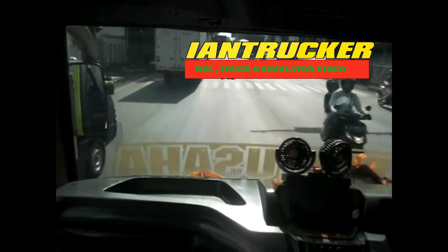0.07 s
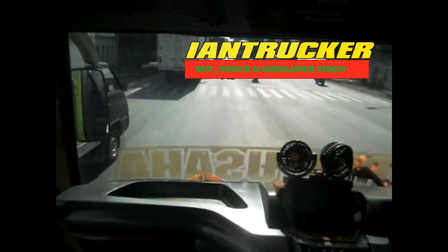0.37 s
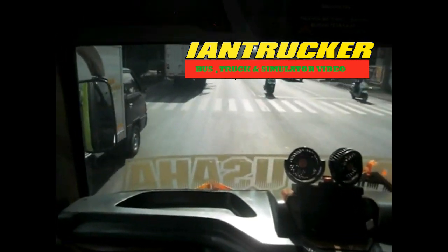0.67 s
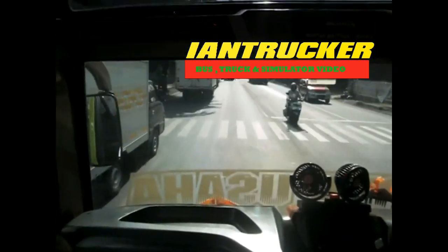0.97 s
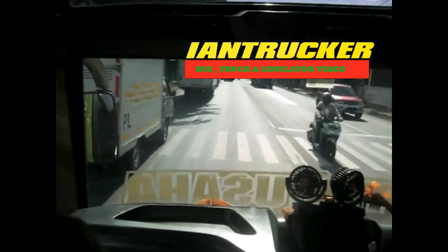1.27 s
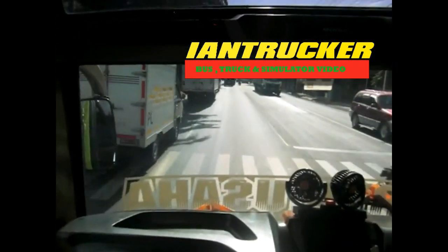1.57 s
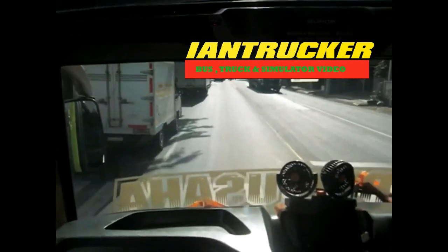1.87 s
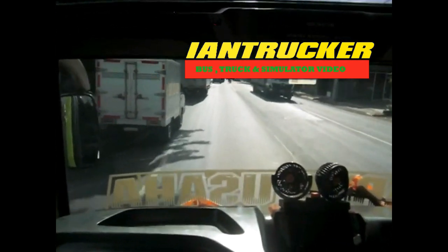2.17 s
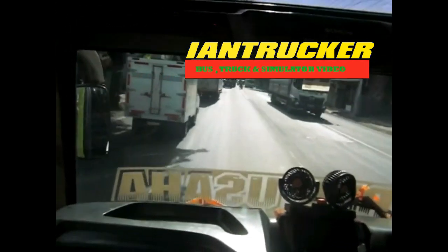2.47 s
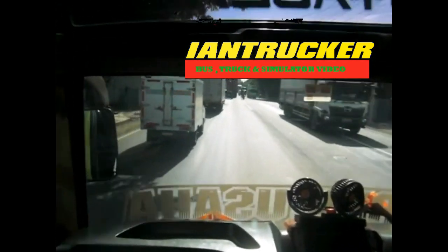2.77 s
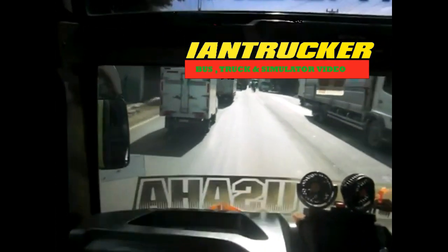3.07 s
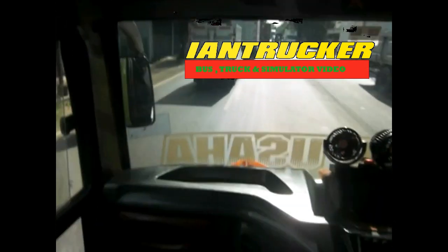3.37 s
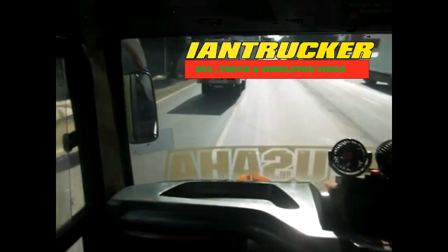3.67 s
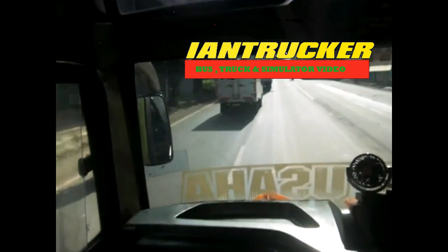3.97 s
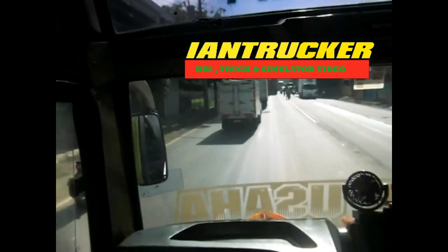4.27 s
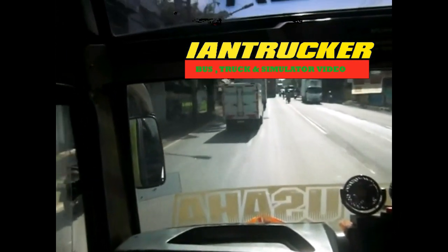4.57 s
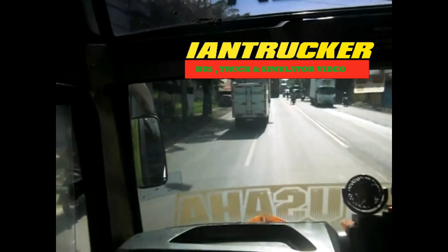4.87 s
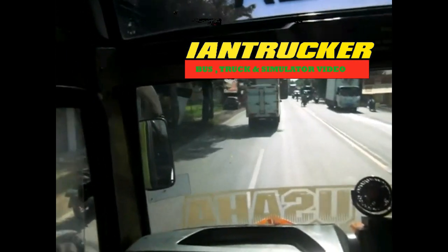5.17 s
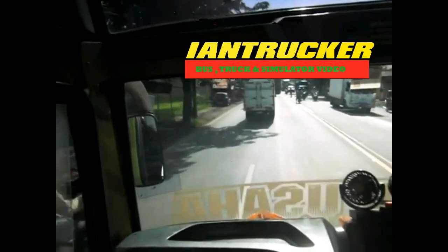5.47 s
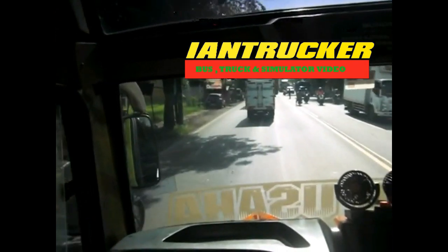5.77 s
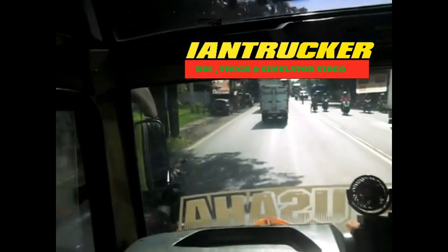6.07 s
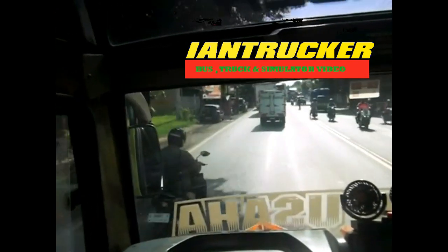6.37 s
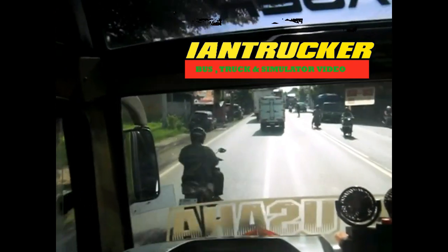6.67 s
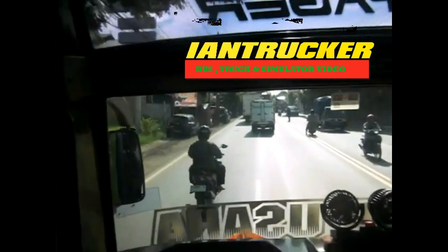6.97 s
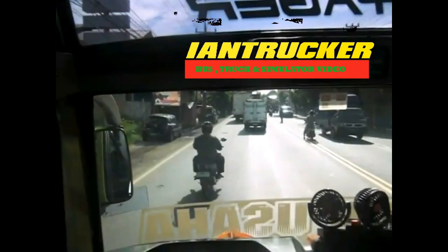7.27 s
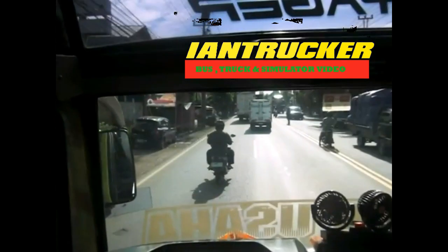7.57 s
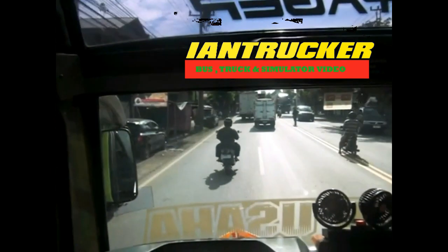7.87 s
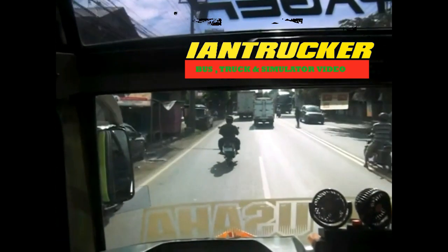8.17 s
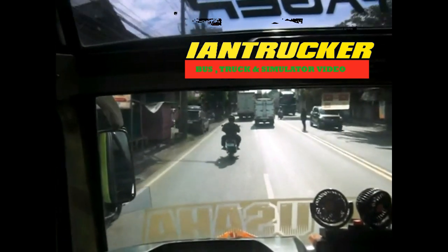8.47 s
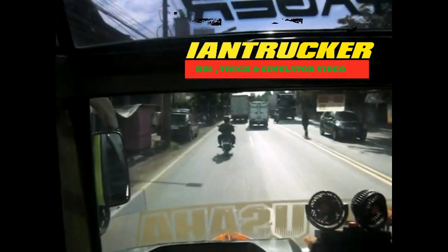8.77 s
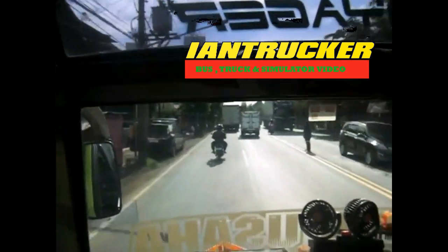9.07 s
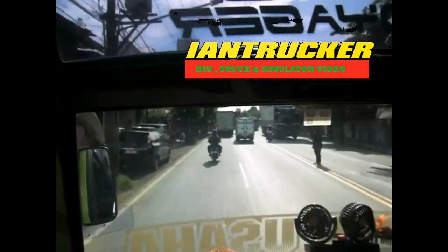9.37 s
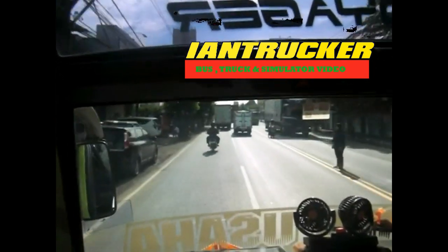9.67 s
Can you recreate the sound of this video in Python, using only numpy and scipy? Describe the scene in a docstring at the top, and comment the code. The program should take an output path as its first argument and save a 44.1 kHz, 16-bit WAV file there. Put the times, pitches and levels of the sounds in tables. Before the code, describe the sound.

A diesel bus drives along a busy road, heard from the middle of the cab with a window open. Throughout, the engine booms close by over body rumble, tyre roar and a light hiss of air. It revs up gradually with a faint rasp until about 4 seconds, then settles. A second low note throbs against it, strongest from about 3.5 to 7 seconds. Vehicles whoosh past the window, most clearly at around 2.3 seconds and, with a brighter hiss, at 5.2, then more softly near 7 and 8. Faint hums come and go, and loose trim gives small clicks, around 6 seconds and again from 8 onward. The road noise grows in the second half. From about 9 seconds the gear whine rises and the engine pulls again, and a two-note horn gives one very short pip at 9.3 seconds.

```python
"""In the cab of a diesel bus on a busy road, microphone mid-cab, window open. Close by, the engine revs up
and settles, its gears whine with it and a second low note throbs against it. The road shakes the body,
loose trim clicks and tyre roar grows at the window. Just outside, each vehicle that slides past throws
roar and hiss back in. Brief hums come and go; near the end a two-reed horn pips once."""
import sys
import numpy as np
from scipy import signal
from scipy.fft import rfft, irfft, next_fast_len
from scipy.io import wavfile
from scipy.ndimage import map_coordinates

SR = 44100
rng = np.random.default_rng(int(sys.argv[2]) if len(sys.argv) > 2 else 0)


def int16_out(signal):
    """Quantize to a 16-bit WAV file."""
    q = np.round(np.clip(np.atleast_2d(signal).T, -1, 1) * 32767)
    wavfile.write(sys.argv[1], SR, q.astype(np.int16))


N = 437031
TIME = np.arange(N) / SR

# Levels are relative: each source adds its own gains.
# the engine revs up, eases off and pulls again: t/s, firing f/Hz
FIRING_RATE = [(0, 46.4), (1, 47.6), (1.5, 48.7), (2.1, 50), (2.6, 53), (3.1, 56), (3.5, 57.9), (4.1, 59.4),
               (4.7, 59), (5.3, 57.9), (6, 57.2), (7, 56.7), (8.4, 56.4), (9.2, 57.2), (9.9, 59.1)]
# its effort: t/s, firing tone level/dB, octave level/dB
ENGINE_EFFORT = [(0, -20.5, -32.5), (.8, -18, -29), (1.3, -19.5, -36), (1.6, -20.5, -33),
                 (1.75, -21, -25.5), (2.15, -19.5, -23.5), (2.45, -16.5, -31.5), (2.8, -23, -35),
                 (3.3, -21, -31), (3.8, -34, -40.5), (4.7, -20, -41), (5.2, -29.5, -47), (6, -25, -49),
                 (7.5, -21.5, -33), (8.2, -24, -28.5), (8.7, -24.5, -37), (9.55, -21, -42),
                 (9.9, -25.5, -37.5)]
# firing tone and throb dip briefly: t/s, depth/dB
BOOM_DIPS = [(.43, 4), (.88, 11), (1.22, 6), (1.82, 4), (2.25, 8)]
# load on the gears: t/s, whine level/dB
GEAR_LOAD = [(0, -39), (1.2, -45.5), (1.9, -39), (2.5, -43), (4, -44.5), (5.2, -48), (5.8, -40), (6.7, -42),
             (7.6, -39.5), (8.55, -40), (8.9, -36), (9.05, -28.5), (9.25, -25.5), (9.53, -32.5),
             (9.66, -28), (9.9, -27.5)]
# the second low note: t/s, f/Hz, level/dB
THROB_NOTE = [(0, 50.7, -29), (.65, 48.8, -24.5), (1.3, 52.1, -28), (2, 52.1, -29), (2.9, 55, -26),
              (3.45, 53.6, -14), (3.8, 51.2, -18), (4.2, 48.6, -15.5), (4.7, 49.4, -26), (5.2, 48.2, -17.5),
              (5.6, 50.6, -28), (6, 49.6, -19), (6.65, 49, -25), (7, 50.4, -16), (7.4, 49.8, -29),
              (8.4, 50.3, -29), (8.8, 50.2, -33), (9.07, 55.5, -23.5), (9.4, 51.8, -32), (9.9, 54.2, -31)]
# the road, louder as the drive goes on: t/s, rumble level/dB, roar level/dB, hiss level/dB
ROAD_LEVELS = [(0, -32, -33.5, -45), (1.25, -31, -35.5, -48), (2.6, -33.5, -35, -46),
               (4.4, -34.5, -35.5, -45.5), (5.45, -30.5, -33, -43.5), (6, -27.5, -30, -43),
               (7.05, -31.5, -33, -45), (8.05, -27.5, -30, -42.5), (8.7, -26.5, -27, -41),
               (9.55, -27.5, -29, -42.5), (9.9, -27, -27, -40)]
# the wheels drop into dips: t/s, change of rumble level/dB
WHEEL_JOLTS = [(.63, -1), (1.1, -4), (1.57, 2), (4.65, 4), (6.18, 1), (7.84, 1)]
# spectrum of the rumble underfoot: f/Hz, level/dB
RUMBLE_SPECTRUM = [(18, -11), (27, -6), (36, 4), (55, 2.5), (72, 0), (85, -4), (150, -3), (200, -9.5),
                   (290, -18.5), (600, -60.5)]
# cab panel modes, the lowest is the boom of the cab's air: f/Hz, width/Hz, level/dB
PANEL_MODES = [(47.5, 2.8, -1), (100, 11, 4.5), (130, 16.3, 1.5), (156.4, 40, -2.5), (225, 13.5, 3.5),
               (253.4, 6.6, 6)]
# spectrum of tyre and engine roar at the window: f/Hz, level/dB
ROAR_SPECTRUM = [(150, -8), (270, -3.5), (340, -1), (480, -0.5), (680, -3.5), (900, -3.5), (1200, -5.5),
                 (1600, -8.5), (1800, -11), (2300, -11.5), (3400, -18.5), (4400, -19.5), (5500, -23),
                 (10000, -50)]
# resonances of cab and engine cover in the roar: f/Hz, width/Hz, level/dB
CAB_MODES = [(354, 37, 4.5), (427, 47, 3), (484, 27, -1), (590, 15, 5.5), (618, 17.7, 10), (772, 92, 0.5),
             (915, 35, 1), (1137, 18, -13), (1332, 102, 2), (1479, 16.5, 5.5), (1570, 130, -2),
             (1900, 65, 0.5), (4440, 90, 1.5)]
# spectrum of the air at the window: f/Hz, level/dB
AIR_SPECTRUM = [(1500, -10), (3200, 3), (4400, 6.5), (5700, -0.5), (6600, 2.5), (7600, -4), (8500, -5),
                (9600, -10.5), (10800, -12), (12000, -58)]
# ring of the loose trim: f/Hz, width/Hz, level/dB
TRIM_MODES = [(4400, 1500, 0), (8000, 2000, -1)]
# the rasp, strongest as the revs climb to their top: t/s, level/dB
RASP_LEVELS = [(0, -57), (2, -51.5), (3.1, -47), (3.6, -48.5), (4.4, -46), (5, -49), (9.9, -62)]
# engine cover resonances: f/Hz, width/Hz, level/dB
COVER_MODES = [(1566, 116, 1.5), (3100, 380, -9.5)]
# vehicles passing the window: closest t/s, rise time/s, road noise lift/dB, thrown-back hiss level/dB
VEHICLES = [(.53, .4, 1.5, -68), (1.04, 0.9, 2, -71), (2.34, 0.58, 6.5, -50), (3.12, 0.28, 2, -69),
            (3.33, 0.35, 3, -69), (3.98, 0.096, 1.5, -70), (5.22, 0.4, 3, -43.5), (6.88, 0.41, 3.5, -57),
            (7.82, 0.98, 3, -57), (9.06, 0.1, 0.5, -62), (9.43, 0.64, 1.5, -62)]
# spectrum of tyre hiss thrown back by their flanks: f/Hz, level/dB
FLANK_SPECTRUM = [(2000, -2.5), (4500, -2), (6300, 7), (7600, 1), (8600, -1), (10000, -2.5), (11300, -10)]
# knocks on the loose trim: t/s, level/dB
TRIM_KNOCKS = [(.361, -35), (1.283, -36), (5.758, -32), (6.173, -31), (8.34, -31), (9.078, -30),
               (9.125, -31), (9.862, -26)]
# brief hums and whines: start t/s, end t/s, first f/Hz, last f/Hz, level/dB
HUMS = [(.6, 1.5, 334, 341, -45), (2.15, 2.74, 441, 439, -44), (2.499, 2.9, 780, 774, -46),
        (3.7, 4.7, 156.4, 164, -40), (4.2, 4.697, 131, 133, -36), (4.6, 5.4, 185, 187, -40.5),
        (5.2, 6.1, 135, 132.2, -35), (5.9, 6.8, 102.1, 101.2, -32.5), (5.9, 6.6, 144.5, 151.1, -34),
        (7.1, 8.3, 827, 823, -43.5), (7.1, 8.2, 1485, 1504, -47), (8.402, 9.5, 214.5, 218.6, -35)]
# the horn's two reeds: start t/s, length/s, f/Hz, level/dB
HORN_REEDS = [(9.302, .034, 423, -25.8), (9.313, .037, 505, -27.5)]
# the horn's flare as heard from the cab: f/Hz, level/dB
HORN_FLARE = [(420, -2), (850, 1), (1300, 0), (1700, -1.5), (2100, -8), (2550, -13), (3100, -28)]


def undb(db):
    """Decibels to gain."""
    return 10 ** (np.asarray(db) / 20)


def unit(x):
    """Scale to rms 1."""
    return x / np.sqrt(np.mean(x ** 2))


def curves(table):
    """One value per sample for each column after the time."""
    times, *columns = np.transpose(table)
    return [np.interp(TIME, times, column) for column in columns]


def colour(points, f):
    """Gain at f of a spectrum drawn on a log-frequency axis."""
    hz, db = np.transpose(points)
    return undb(np.interp(np.log(f), np.log(hz), db))


def resonances(modes, f):
    """Complex response of a set of damped modes."""
    return sum(undb(db) / (1 + 1j * (f * f - hz * hz) / (f * width)) for hz, width, db in modes)


def shaped(x, response, table):
    """Send x through a spectrum or a set of modes; rms 1."""
    size = next_fast_len(N)
    f = np.maximum(np.fft.rfftfreq(size, 1 / SR), 1)
    return unit(irfft(rfft(x, size) * response(table, f), size)[:N])


def noise():
    """White noise."""
    return rng.standard_normal(N)


def wander(rate_hz):
    """Smooth random drift through rate_hz values a second; rms 1."""
    steps = rng.standard_normal(4096)
    coarse = map_coordinates(steps, [TIME[::64] * rate_hz], order=3, mode="wrap")
    return unit(coarse.repeat(64)[:N])


def turning(hz):
    """Phase in radians of something that cycles at hz."""
    return 2 * np.pi * np.cumsum(hz) / SR


def swell(peak_s, rise_s, drop_s):
    """A rounded hump of height 1 with its own rise and drop."""
    offset = np.maximum((peak_s - TIME) / rise_s, (TIME - peak_s) / drop_s)
    return np.exp(1 - np.sqrt(1 + 2 * offset ** 2))


def engine(phase, firing_db, octave_db, load_db, orders_db=-12, fall_db=-2.5):
    """Close by, the firing tone booms; unequal cylinders add weak multiples of the crank rate."""
    firing = undb(firing_db + .5 * wander(9)) * np.sin(phase)
    octave = undb(octave_db + .8 * wander(11)) * np.sin(2 * phase)
    orders = sum(undb(fall_db * k + 3 * wander(6)) * np.sin(k * phase / 2 + rng.uniform(0, 2 * np.pi))
                 for k in range(5, 12))
    return np.sqrt(2) * (firing + octave) + undb(load_db + orders_db) * unit(orders)


def gear_whine(firing_hz, level_db, mesh_ratio=10.33, waver=.006, flutter=.62):
    """Meshing gears sing at a multiple of the engine speed, wavering and breaking up."""
    phase = turning(mesh_ratio * firing_hz * (1 + waver * wander(25)))
    return undb(level_db - 3) * unit((1 + flutter * wander(19)) * np.sin(phase))


def throb(waver_db=.8):
    """A second low note, likely the exhausts of the traffic alongside, beats against the engine."""
    hz, db = curves(THROB_NOTE)
    return np.sqrt(2) * undb(db + waver_db * wander(3.57)) * np.sin(turning(hz))


def body_rumble(level_db, floor_db=1, panels_db=-2, bumps_db=.6):
    """The uneven road shakes the floor and rings the panels all round the microphone."""
    jolt_db = sum(db * swell(s, rise_s=.041, drop_s=.041) for s, db in WHEEL_JOLTS)
    floor = undb(floor_db) * shaped(noise(), colour, RUMBLE_SPECTRUM)
    shake = shaped(noise(), colour, RUMBLE_SPECTRUM)
    panels = undb(panels_db) * shaped(shake, resonances, PANEL_MODES)
    return undb(level_db + jolt_db + bumps_db * wander(5.7)) * (floor + panels)


def roar(phase, level_db, window_db=-2, cab_db=-4.5, knocks_db=-18, pulsing=.082, sharpness=900):
    """Tyre and engine noise comes in at the window; it and the knock of each firing ring the cab."""
    rush = shaped(noise() * (1 + pulsing * np.cos(2 * phase)), colour, ROAR_SPECTRUM)
    # one narrow, uneven pulse per firing: its overtones slide through the cab's resonances
    knocks = undb(2 * wander(60)) * np.exp(sharpness * (np.cos(phase) - 1))
    drive = shaped(noise() + undb(knocks_db) * unit(np.gradient(knocks)), colour, ROAR_SPECTRUM)
    ringing = undb(cab_db + .5 * wander(10)) * shaped(drive, resonances, CAB_MODES)
    direct = undb(window_db + .5 * wander(12)) * rush
    return undb(level_db) * (direct + ringing)


def trim_ring(knocks, decay_s=.00066):
    """Each knock gives the loose trim a short bright ring; rms 1."""
    envelope = signal.lfilter([1], [1, -np.exp(-1 / (decay_s * SR))], knocks)
    return shaped(envelope * noise(), resonances, TRIM_MODES)


def window_hiss(level_db, air_db=-4, ticks_db=-19, tick_spread_db=4, ticks_per_s=110):
    """Air flutters at the window; loose trim ticks faintly at random."""
    air = undb(air_db + .5 * wander(30)) * shaped(noise(), colour, AIR_SPECTRUM)
    struck = rng.random(N) < ticks_per_s / SR
    strength = undb(tick_spread_db * np.clip(noise(), -2, 2))
    return undb(level_db) * (air + undb(ticks_db) * trim_ring(struck * strength))


def cover_rasp(phase, depth=.65):
    """A ringing rasp, likely the engine cover, shaken once per firing."""
    db, = curves(RASP_LEVELS)
    return undb(db) * shaped(noise() * (1 + depth * np.cos(phase)), resonances, COVER_MODES)


def passing_vehicles(drop_s=.06, focus=1.2):
    """Each flank reflects more as it nears, then is gone: road noise lift in dB and gain of its hiss."""
    lift_db = flank_gain = 0
    for closest_s, rise_s, peak_lift_db, hiss_db in VEHICLES:
        nearness = swell(closest_s, rise_s, drop_s)
        lift_db += peak_lift_db * nearness
        flank_gain += undb(hiss_db) * nearness ** focus
    return lift_db, flank_gain


def flank_hiss(gain):
    """Just outside the window, a passing flank throws bright tyre hiss back at the microphone."""
    return gain * shaped(noise(), colour, FLANK_SPECTRUM)


def trim_clicks():
    """Now and then a harder knock makes the cab's trim click clear of the hiss."""
    knocks = np.zeros(N)
    for s, db in TRIM_KNOCKS:
        knocks[int(s * SR)] = undb(db)
    ringing = trim_ring(knocks)
    return ringing * knocks.max() / np.abs(ringing).max()


def brief_hums(waver=.0039):
    """Single tones that swell, glide a little and fade."""
    out = 0
    for start, end, first_hz, last_hz, db in HUMS:
        progress = np.clip((TIME - start) / (end - start), 0, 1)
        hz = (first_hz + (last_hz - first_hz) * progress) * (1 + waver * wander(30))
        arch = np.sqrt(8 * progress * (1 - progress))
        out += undb(db + 2 * wander(16)) * arch * np.sin(turning(hz))
    return out


def horn(rise_s=.012, ring_s=.01, waver=.003):
    """Two reeds buzz through a flare for an instant, heard from inside the cab."""
    out = 0
    for start, length, hz, db in HORN_REEDS:
        phase = turning(hz * (1 + waver * wander(90)))
        reed = sum(colour(HORN_FLARE, k * hz) * np.sin(k * phase + rng.uniform(0, 2 * np.pi))
                   for k in range(1, 7))
        attack = np.clip((TIME - start) / rise_s, 0, 1)
        release = np.exp(-np.clip(TIME - start - length, 0, 1) / ring_s)
        out += undb(db) * attack * release * unit(reed)
    return out


def scene(buffet_db=.53, rumble_share=.95, hiss_share=.89):
    """Everything as it reaches one microphone in the middle of the cab."""
    firing_hz, = curves(FIRING_RATE)
    firing_db, octave_db = curves(ENGINE_EFFORT)
    gears_db, = curves(GEAR_LOAD)
    rumble_db, roar_db, hiss_db = curves(ROAD_LEVELS)
    phase = turning(firing_hz)
    lift_db, flank_gain = passing_vehicles()
    shake_db = rumble_db + rumble_share * lift_db
    dip_db = sum(db * swell(s, rise_s=.016, drop_s=.016) for s, db in BOOM_DIPS)
    bus = engine(phase, firing_db - dip_db, octave_db, shake_db)
    bus += body_rumble(shake_db) + gear_whine(firing_hz, gears_db)
    eddies = undb(buffet_db * wander(45))  # at the window they shake roar and hiss together
    road = roar(phase, roar_db + lift_db)
    road += window_hiss(hiss_db + hiss_share * lift_db) + flank_hiss(flank_gain)
    bed = bus + undb(-dip_db) * throb() + cover_rasp(phase) + eddies * road
    return (bed + trim_clicks() + brief_hums() + horn())[None]


def record(dry):
    """The camera in the cab cuts the deepest bass and the top."""
    low_cut = signal.butter(2, 16, "high", fs=SR, output="sos")
    high_cut = signal.ellip(8, .2, 70, 11400, fs=SR, output="sos")
    return signal.sosfilt(high_cut, signal.sosfilt(low_cut, dry))


dry = scene()
out = record(dry)
int16_out(out)
```